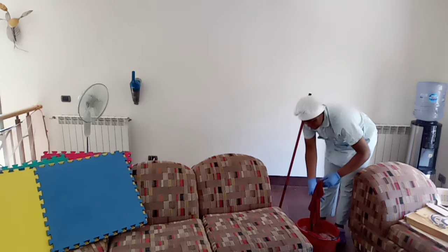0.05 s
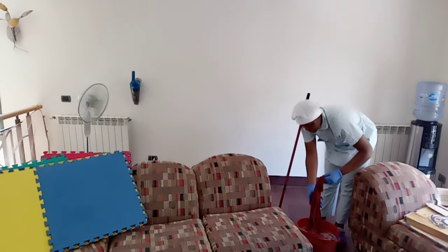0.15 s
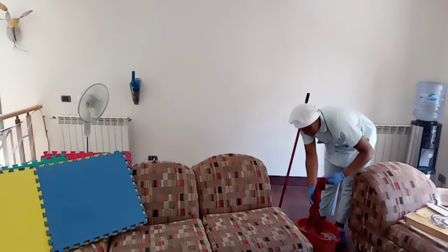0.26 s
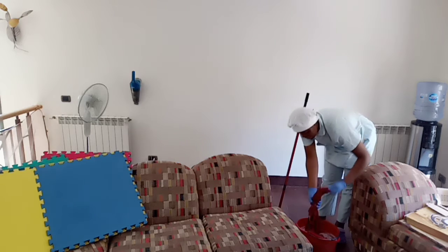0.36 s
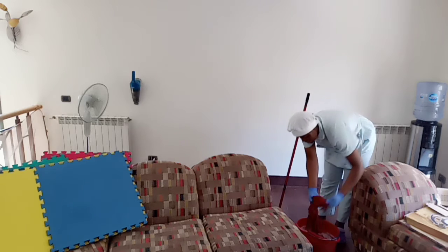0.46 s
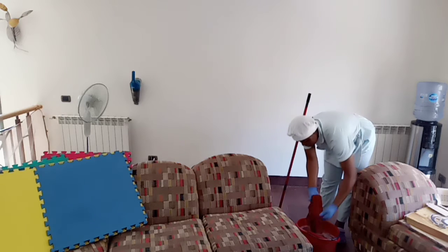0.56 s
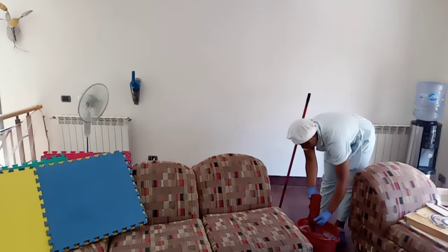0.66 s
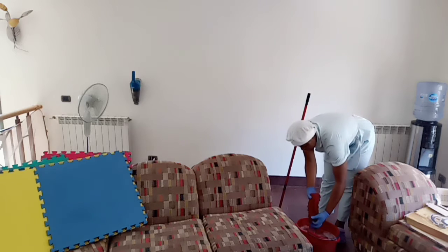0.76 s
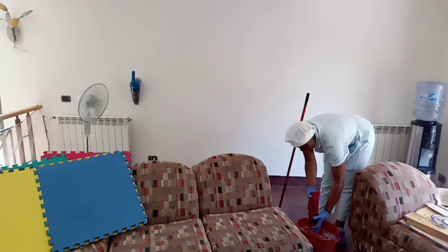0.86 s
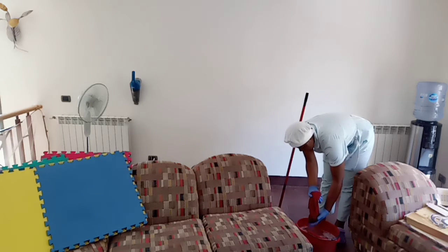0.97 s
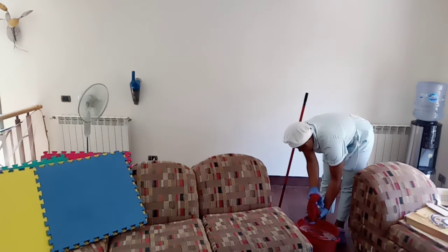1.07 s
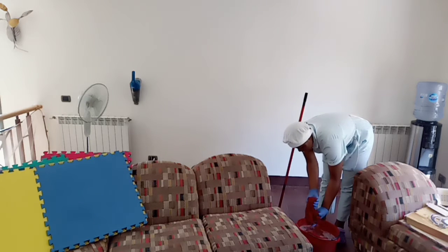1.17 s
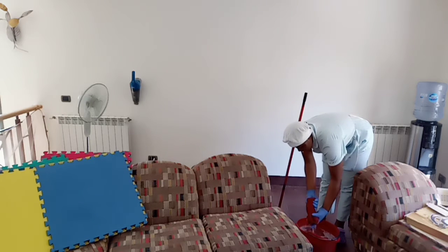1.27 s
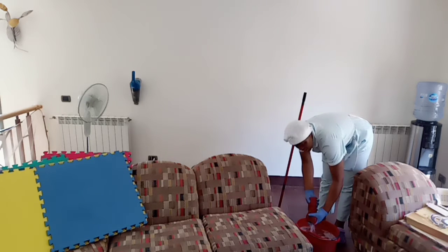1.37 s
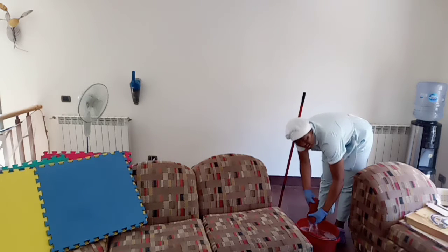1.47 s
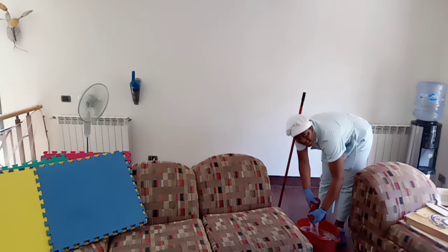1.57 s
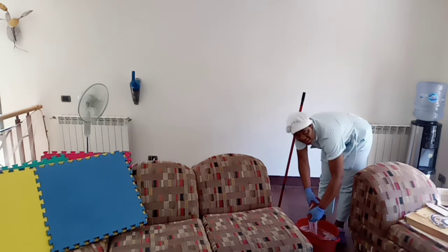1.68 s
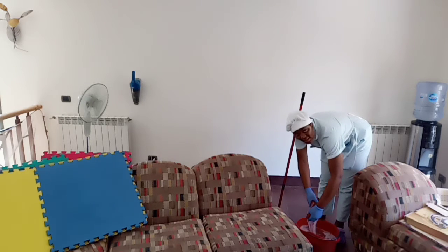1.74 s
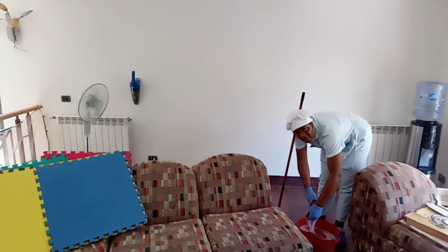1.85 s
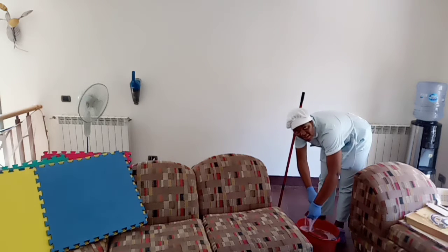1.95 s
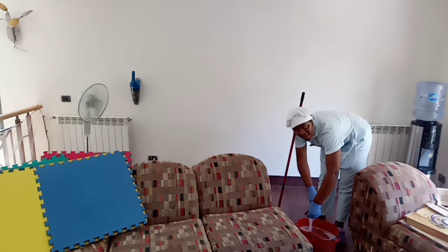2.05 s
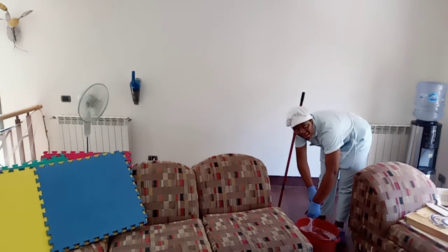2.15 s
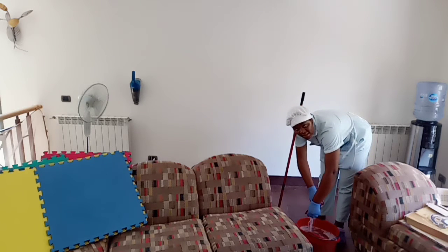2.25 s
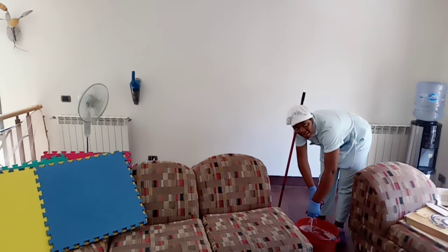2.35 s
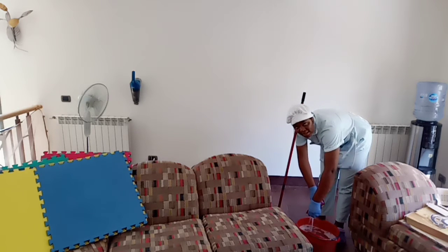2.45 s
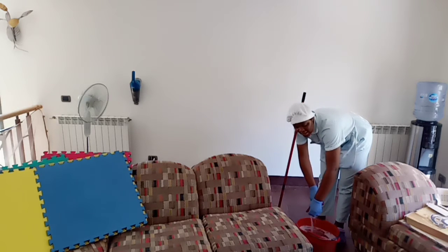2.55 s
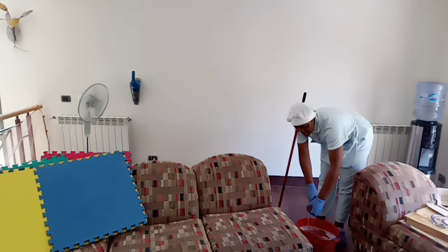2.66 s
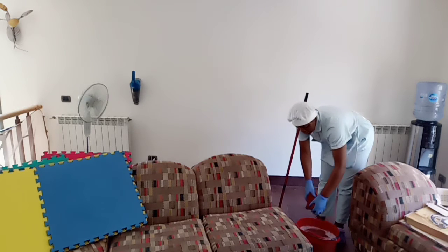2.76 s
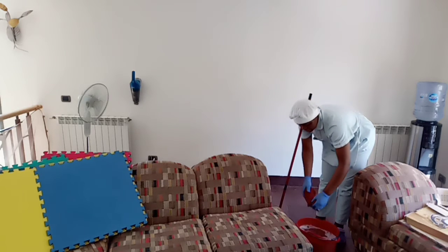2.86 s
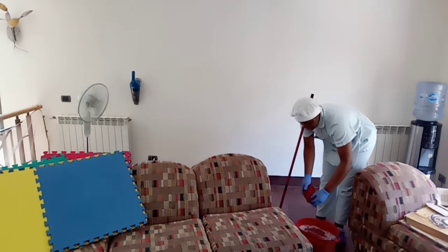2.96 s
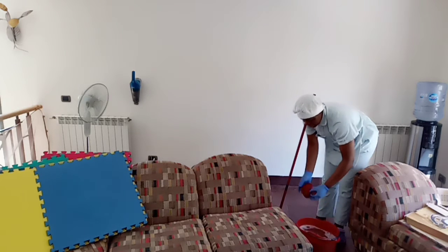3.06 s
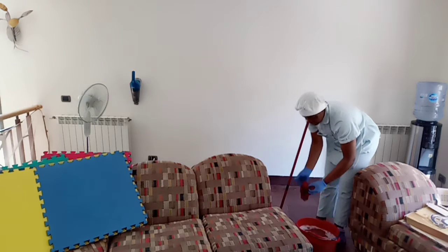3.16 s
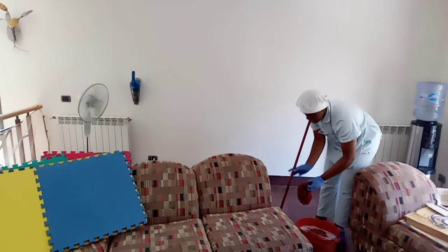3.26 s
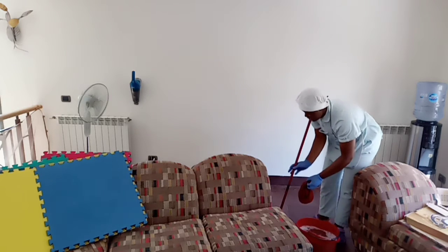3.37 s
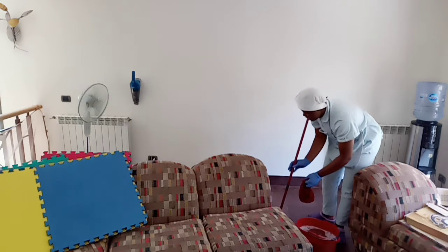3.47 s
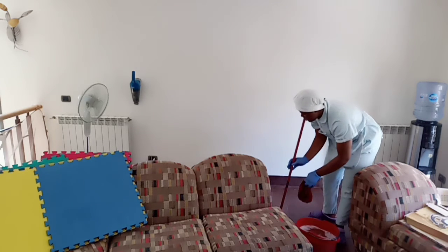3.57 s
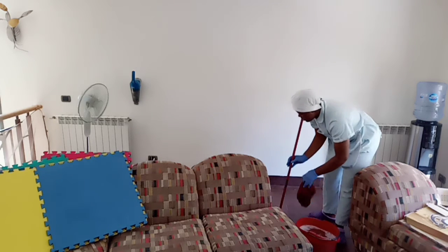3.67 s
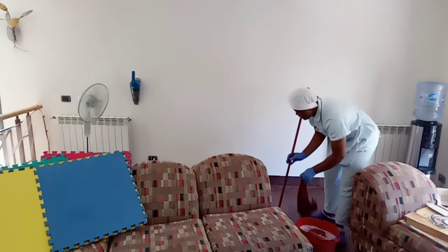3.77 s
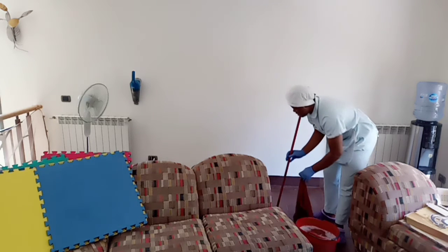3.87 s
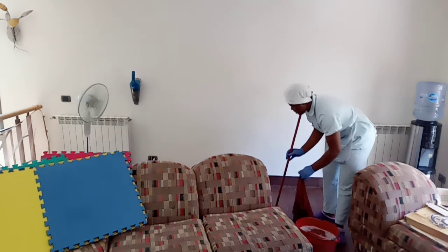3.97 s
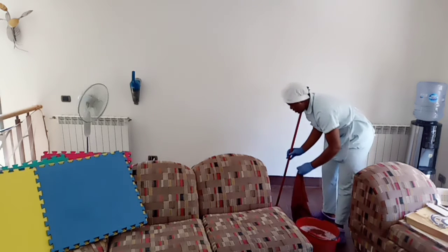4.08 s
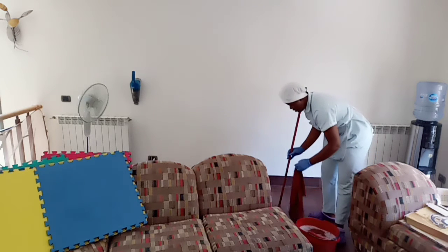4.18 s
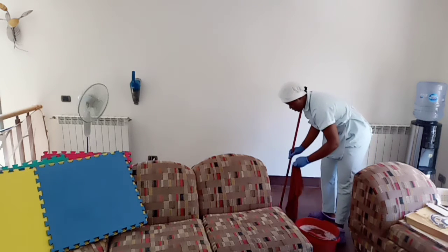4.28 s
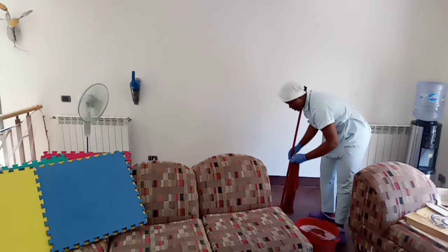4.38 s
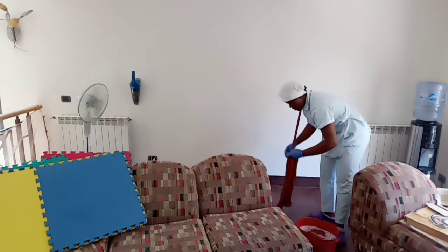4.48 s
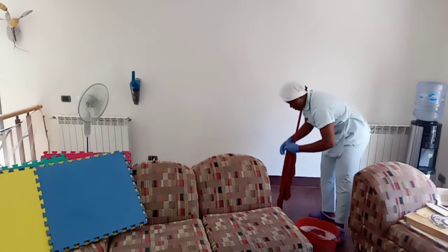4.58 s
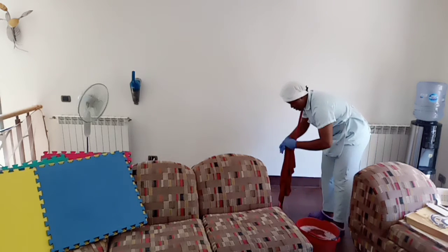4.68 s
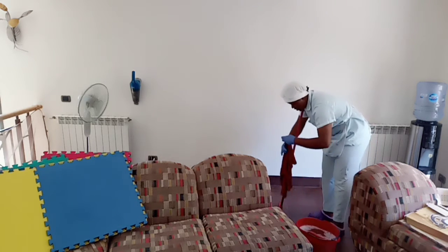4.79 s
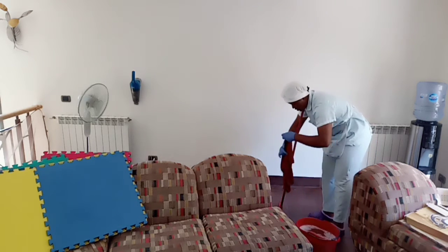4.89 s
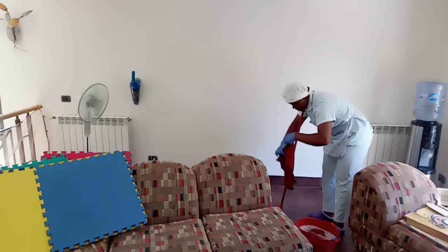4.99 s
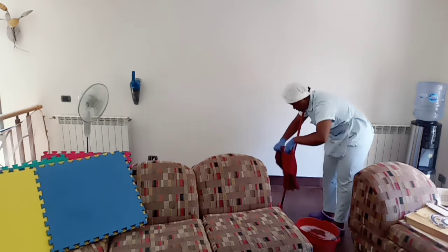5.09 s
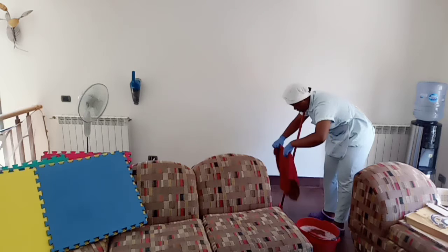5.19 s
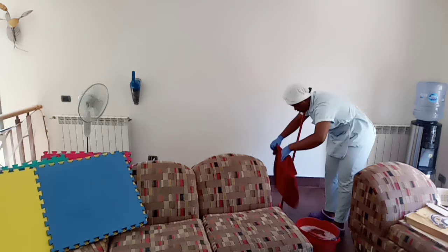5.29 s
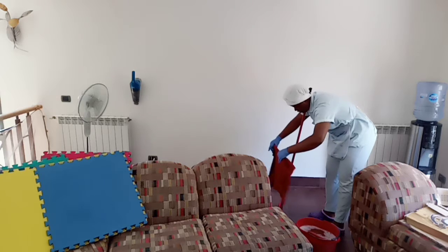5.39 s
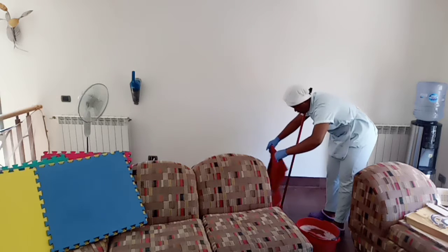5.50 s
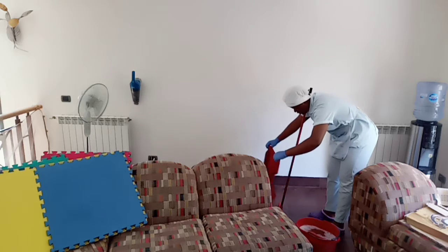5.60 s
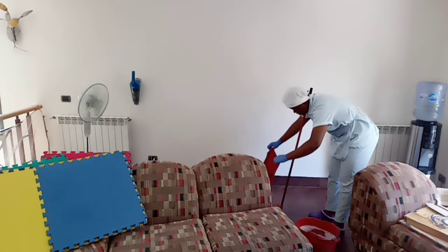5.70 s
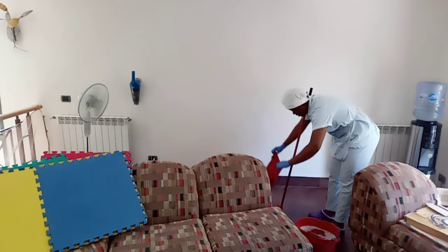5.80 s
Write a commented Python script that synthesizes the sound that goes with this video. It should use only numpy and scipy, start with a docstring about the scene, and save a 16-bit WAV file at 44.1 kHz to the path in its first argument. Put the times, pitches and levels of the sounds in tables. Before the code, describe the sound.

Faint dribbles and plinking bubbles grow into a short burst of bright, bubbly water falling into a bucket as a cloth is wrung by hand. It breaks into spray and last drips. Then come crackly wet rustles, a sharp flappy slap and a woody clack with a low thud, and quieter rustling to the end. Heard from across an echoing living room with a low, calm background.

```python
"""Water wrung from a floor cloth splashes, gurgles and thins to drips: ticking spray and swarms of ringing bubbles.
Single drops smack as noise puffs; single loud bubbles ring as damped, rising sines.
The wet cloth rustles in crackling strokes and slaps as it falls open; the mop knocks and rings damped modes.
A hard-walled room answers with noise echoes, over a quiet, slowly sinking room tone of coloured noise."""
import sys
import numpy as np
from scipy import signal
from scipy.io import wavfile

SR = 44100
rng = np.random.default_rng(int(sys.argv[2]) if len(sys.argv) > 2 else 0)


def master(y):
    """Save y as 16-bit WAV."""
    cut = np.clip(np.atleast_2d(y).T, -1, 1)
    pcm = np.round(cut * 32767)  # scale
    wavfile.write(sys.argv[1], SR, pcm.astype(np.int16))


N = 257279
TIME_S = np.arange(N) / SR

# All levels are relative, ahead of the mix gains.
# Long twist driving the stream out of the cloth: [t/s, flow/dB re full]
STREAM_FLOW = [(1.31, -17.5), (1.335, -10), (1.46, -8), (1.5, -4), (1.65, -4.5), (1.76, 0.5), (2.21, 0.5),
               (2.54, -10.5), (2.72, -16.5), (3.1, -30)]
# Short squeezes that find the grip and press out the last water: [start/s, hold/s, flow/dB re full]
SQUEEZES = [(0.332, 0.15, -17.5), (0.721, 0.088, -14), (0.869, 0.08, -12.5), (1.204, 0.031, -14),
            (2.446, 0.045, -6), (2.755, 0.13, -13)]
# Lifted cloth running a little by itself, one row: [start/s, hold/s, flow/dB re full]
DRIBBLE = (0.23, 1.0, -24.5)
# Single loud bubbles: [t/s, f/Hz, level/dB, ring time/cycles]
LOUD_BUBBLES = [(0.128, 2560, -48.5, 14), (0.338, 3010, -45, 12), (0.413, 2280, -42, 9.4),
                (0.498, 2310, -38, 6), (0.681, 1514, -47.5, 7.1), (0.732, 3710, -39.5, 22),
                (0.894, 1610, -43.5, 6.3), (0.969, 2154, -33, 5), (1.117, 3250, -50, 7.1),
                (1.209, 3900, -45, 9.6), (1.327, 514, -48.5, 5.7), (1.487, 956, -43.5, 4.1),
                (1.507, 3094, -30.5, 19), (1.697, 2556, -32, 14), (1.722, 612, -39, 5.3),
                (1.729, 3200, -26, 7.5), (1.786, 3390, -19, 7), (1.783, 580, -34, 1.7),
                (1.832, 525, -39.5, 3.2), (1.969, 840, -26, 5.4), (2.083, 3600, -25, 8.7),
                (2.085, 464, -43.5, 4), (2.113, 288, -40.5, 2.94), (2.116, 1006, -25, 4),
                (2.185, 3100, -27, 5.3), (2.367, 4600, -25.5, 3.4), (2.38, 3340, -29, 11),
                (2.45, 2070, -31.5, 22), (2.457, 2490, -26, 7.6), (2.638, 535, -39, 2.1),
                (2.735, 462, -50, 14), (2.811, 819, -33.5, 3.6), (2.811, 480, -42, 3.6),
                (2.863, 2530, -29, 2.4), (2.901, 3520, -27, 2.5), (3.011, 1525, -45.5, 4.5)]
# Single drops smacking on the water: [t/s, level/dB]
DROPS = [(0.473, -42), (0.71, -42.5), (0.781, -42.5), (0.898, -42), (1.16, -43), (1.208, -36.5),
         (1.475, -42.5), (2.118, -26), (2.218, -41), (2.501, -27), (2.865, -43), (3.021, -47), (3.389, -57)]
# Spectrum of the spray: [f/Hz, level/dB]
SPRAY_SPECTRUM = [(700, -21), (1500, -39.5), (2400, 2.5), (3800, 2), (5000, -10), (6000, -14), (7800, -12),
                  (9500, -6.5), (11500, -16.5), (15500, -24.5)]
# Spectrum of the hollow over the water in the bucket: [f/Hz, level/dB]
BUCKET_SPECTRUM = [(200, -17), (290, 7), (380, -11), (500, 7.5), (650, 4.5), (800, -9), (1500, -16)]
# Spectrum of the stream drumming in the bucket: [f/Hz, level/dB]
PATTER_SPECTRUM = [(50, -47), (90, 22.5), (170, -19), (300, 19.5), (600, 12), (1500, 6.5),
                   (2500, -42), (6000, -30)]
# Spectrum of a drop's smack: [f/Hz, level/dB]
SMACK_SPECTRUM = [(300, -14.5), (1500, -13.0), (3600, 16.0), (5200, -8), (9800, -2.5), (15000, -16)]
# Strokes of the cloth through gloved hands: [fastest t/s, rise and fall/s, rub/dB, wet fizz/dB]
STROKES = [(0.02, 0.077, -63.5, -78), (0.28, 0.086, -71, -69), (3.23, 0.13, -63, -78),
           (3.406, 0.052, -50.5, -64), (3.55, 0.042, -63, -66), (3.66, 0.088, -60, -69.5),
           (4.48, 0.089, -54, -72.5), (4.72, 0.067, -57.5, -71.5), (4.97, 0.09, -56.5, -67),
           (5.3, 0.13, -61, -70.5), (5.52, 0.08, -65.5, -76), (5.66, 0.071, -66.5, -73)]
# Spectrum of rubbing fibres: [f/Hz, level/dB]
RUB_SPECTRUM = [(200, -36.5), (600, 7), (1400, 0), (2400, 9.5), (3800, 8.5), (5000, -5), (9000, -46)]
# Spectrum of the wet fizz: [f/Hz, level/dB]
FIZZ_SPECTRUM = [(2500, -11), (5000, 0), (8000, 2.5), (9500, 8), (11500, -4), (15500, -10)]
# Folds of the wet cloth landing: [t/s, level/dB, decay/s]
SLAPS = [(3.955, -37, 0.0059), (3.959, -31.5, 0.0085), (3.9635, -27.5, 0.0056), (3.9725, -23, 0.006),
         (3.980, -36.5, 0.01)]
# Spectrum of the slap: [f/Hz, level/dB]
SLAP_SPECTRUM = [(50, -34), (100, -7.5), (300, -3), (600, -1), (1050, -9.5), (1700, -2), (2400, 2.5),
                 (3900, 1.5), (5200, -14.5), (8000, -12.5), (9500, -10.5), (12000, -23), (15500, -27)]
# Mop head meeting the floor and rattling: [t/s, level/dB, decay/s]
KNOCKS = [(4.2835, -28, 0.011), (4.288, -19, 0.0061), (4.2922, -12.5, 0.0014), (4.3012, -17, 0.0011),
          (4.317, -25.5, 0.0017)]
# Spectrum of the knock: [f/Hz, level/dB]
KNOCK_SPECTRUM = [(30, -23), (60, -16), (85, 0), (160, 0.5), (250, 6), (330, 1.5), (600, -2), (950, -2.5),
                  (1200, -10), (1600, -5.5), (2300, 0.5), (2900, -4.5), (4100, -5), (5000, -21),
                  (9200, -25), (12000, -48)]
# Modes of mop and floor set ringing by the knock: [f/Hz, level/dB, t60/s]
MOP_MODES = [(102, -41, 0.54), (123.2, -36.5, 0.67), (131.3, -34, 0.71), (207.7, -29, 0.43),
             (265, -38, 0.57), (589, -45, 0.23), (1510, -32.5, 0.083), (2350, -15, 0.027)]
# Reverberation of the room: [f/Hz, t60/s]
ROOM_T60 = [(120, 0.96), (350, 0.54), (900, 0.58), (2500, 0.55), (6000, 0.4), (14000, 0.39)]
# Spectrum of the room tone: [f/Hz, level/dB]
HUSH_SPECTRUM = [(25, -32), (50, -4.5), (100, 10.5), (160, 6.5), (300, 3), (700, -1.5), (1400, -8),
                 (2500, -3), (3800, -4.5), (5200, -23), (9500, -18.5), (15000, -31)]

# Parts of the water's sound: (level/dB at full flow, dB gained per dB of flow)
SPRAY_LAW, TINKLE_LAW, SQUELCH_LAW = (-49.5, 0.96), (-42, 1.025), (-53.5, 0.88)
BURBLE_LAW, GURGLE_LAW = (-50, 0.88), (-51.5, 1.31)
# As the cloth empties, more of the stream falls as fine spray; 0 dB at FULL_S
FULL_S, BREAKUP_DB_PER_S = 2.17, 7.0
SQUEEZE_ATTACK_S, SQUEEZE_RELEASE_S = 0.019, 0.037
GURGLE_LAG_S = 0.07  # large bubbles come up from deep, a little after the stream
HOUSE_DB, HOUSE_DRIFT_DB_PER_S = -64, -0.58
EDGE_HZ = 15680


def water():
    """Spray ticks, small bubbles tinkle, the stream gurgles and drums in the bucket; all follow the flow."""
    stream = levels(STREAM_FLOW)
    trickle = np.linalg.norm([squeeze(*row) for row in [DRIBBLE, *SQUEEZES]], axis=0)
    breakup = amp(BREAKUP_DB_PER_S * (TIME_S - FULL_S))
    spray = follow(np.hypot(stream * breakup, trickle), SPRAY_LAW)
    small = follow(stream, TINKLE_LAW)
    beads = follow(trickle, TINKLE_LAW)
    splash = follow(stream, BURBLE_LAW) + follow(trickle, SQUELCH_LAW)
    large = follow(np.interp(TIME_S - GURGLE_LAG_S, TIME_S, stream), GURGLE_LAW)

    # the stream breaks into lumps, so the spray comes in spurts some hundredths of a second long
    lowpass = signal.butter(2, 60, fs=SR, output="sos")
    lumps = evened(signal.sosfilt(lowpass, rng.standard_normal(N)))
    spurts = evened(amp(5.36 * lumps))
    clicks = crackle(2500 + 4000 * spray / spray.max(), spread_db=1)
    ticks = colour(clicks * spurts, SPRAY_SPECTRUM) * spray
    sparkle = swarm(spray, peak_per_s=430, low_hz=4230, high_hz=13950, cycles=5.1, rise=0.039, spread_db=25.5)

    clusters = evened(amp(2 * lumps))  # each lump drags down its own cloud of bubbles
    tinkle = swarm(small * clusters, peak_per_s=820, low_hz=1921, high_hz=4146, cycles=7.1, rise=0.03,
                   spread_db=9)
    # a trickle makes few enough bubbles to tell apart
    plinks = swarm(beads, peak_per_s=230, low_hz=1980, high_hz=4310, cycles=8.2, rise=0.029, spread_db=7.5)
    burble = swarm(splash, peak_per_s=900, low_hz=735, high_hz=2206, cycles=4.2, rise=0.059, spread_db=18)
    gurgle = swarm(large, peak_per_s=370, low_hz=278, high_hz=792, cycles=4.6, rise=0.015, spread_db=5.5)
    patter = colour(crackle(1500, spread_db=6.0), PATTER_SPECTRUM)

    fine = amp(6.5) * ticks + amp(-2.0) * matched(colour(sparkle, SPRAY_SPECTRUM), spray)
    middle = matched(tinkle, small) + matched(plinks, beads) + matched(burble, splash)
    deep = matched(colour(gurgle, BUCKET_SPECTRUM), large) + amp(-15.5) * patter * spray
    return fine + middle + deep


def squeeze(start_s, hold_s, db):
    """Flow from one press on the cloth: wells up, holds, runs out."""
    age_s = TIME_S - start_s
    attack = np.clip(age_s / SQUEEZE_ATTACK_S, 0, 1)
    return amp(db) * attack * np.exp(-np.maximum(age_s - hold_s, 0) / SQUEEZE_RELEASE_S)


def follow(flow, law):
    """Gain of one part of the water's sound: a power law of the flow."""
    db, growth = law
    return amp(db) * (flow + 1e-9) ** growth


def swarm(level, peak_per_s, low_hz, high_hz, cycles, rise, spread_db, count=14000):
    """Bubbles of all sizes between two pitches; more of them as the level grows."""
    out = np.zeros(N)
    rate_per_s = peak_per_s * (level / level.max()) ** 0.33
    when, chance, pitch, size, ring = rng.random((count, 5)).T
    at = (when * N).astype(int)
    for k in np.flatnonzero(chance < rate_per_s[at] * N / SR / count):
        hz = low_hz * (high_hz / low_hz) ** pitch[k]
        tone = bubble(hz, cycles * (.5 + ring[k]), rise * 2 * ring[k], swell=0.046)
        # dividing by the root of the rate keeps the power on the level curve
        gain = amp(spread_db * size[k] ** 3) * level[at[k]] / np.sqrt(rate_per_s[at[k]])
        add(out, at[k] / SR, tone / np.linalg.norm(tone) * gain)
    return out


def bubble(hz, cycles, rise, swell):
    """A trapped bubble swells, rings and goes up in pitch as it nears the surface."""
    age = np.arange(0, 6, hz / (cycles * SR))  # in ring times
    envelope = (1 - np.exp(-age / swell)) ** 2 * np.exp(-age)
    return envelope * np.sin(2 * np.pi * cycles * (age + rise * age ** 2 / 2))


def drips():
    """Larger drops: a smack on the surface, or a small splash with the ring of one bubble."""
    smacks = bursts([(s, db, .003) for s, db in DROPS])
    out = colour(smacks, SMACK_SPECTRUM)
    for s, hz, db, cycles in LOUD_BUBBLES:
        swell = .15 + (700 / hz) ** 2  # big bubbles pinch off slowly
        ring = bubble(hz, cycles, rise=0.02, swell=swell)
        band = [(hz * 0.61, -25), (hz, 0), (hz * 1.56, -18), (hz * 4, -40)]
        splash = evened(colour(rng.standard_normal(len(ring)), band, size=1024))
        envelope = abs(signal.hilbert(ring))
        add(out, s, amp(db) * (ring + amp(-9.5) * splash * envelope) / ring.max())
    return out


def cloth():
    """Wet fibres rub and stick as the cloth is spread, and slap once as it falls open."""
    rub_gain, fizz_gain = strokes()
    rub = rub_gain * colour(crackle(2500, spread_db=2.0), RUB_SPECTRUM)
    fizz = fizz_gain * colour(crackle(3000, spread_db=0.5), FIZZ_SPECTRUM)
    rustle = amp(1) * rub + amp(3.0) * fizz
    slap = amp(-5.5) * blows(SLAPS, SLAP_SPECTRUM, scatter_db=0, tail_db=1.5)
    return room(rustle, direct_db=-3.5, scatter_db=-8.5, tail_db=-19) + slap


def strokes():
    """Gains of rub and fizz: each stroke gathers speed and slows again."""
    s, width_s, rub_db, fizz_db = np.transpose(STROKES)[:, :, None]
    speed = np.exp(-abs(TIME_S - s) / width_s)
    return [np.linalg.norm(amp(db) * speed, axis=0) for db in (rub_db, fizz_db)]


def mop():
    """The mop knocks on the floor: a hard clack over a ringing thud."""
    return amp(-6.5) * blows(KNOCKS, KNOCK_SPECTRUM, scatter_db=-24, tail_db=1.5) + ringing()


def ringing():
    """The hardest contact sets mop head and floor ringing: damped sines."""
    out, t = np.zeros(N), TIME_S[:SR]
    hardest_s = max(KNOCKS, key=lambda row: row[1])[0]
    for hz, db, t60_s in MOP_MODES:
        envelope = amp(db - 60 * t / t60_s) * (1 - np.exp(-t * hz / 2.0))
        add(out, hardest_s, envelope * np.sin(2 * np.pi * (hz * t + rng.random())))
    return out


def blows(rows, spectrum, scatter_db, tail_db):
    """A quick run of contacts, each filling the room in proportion to its energy."""
    out = bursts(rows)
    for s, db, decay_s in rows:
        root_energy = amp(db) * np.sqrt(decay_s * SR / 2)
        add(out, s, root_energy * echoes(scatter_db, tail_db))
    return colour(out, spectrum)


def bursts(rows):
    """Contacts as short puffs of noise: rows of t/s, level/dB, decay/s."""
    out, t = np.zeros(N), TIME_S[:SR // 10]
    for s, db, decay_s in rows:
        add(out, s, amp(db) * np.exp(-t / decay_s) * rng.standard_normal(len(t)))
    return out


def room(x, direct_db, scatter_db, tail_db, count=7):
    """The source wanders from spot to spot in a cycle, each spot with its own echoes."""
    out = amp(direct_db) * x
    spot = TIME_S * 45  # spots passed, 45 a second
    for k in range(count):
        share = np.maximum(1 - abs((spot - k) % count - 1), 0)
        out = out + signal.oaconvolve(x * np.sqrt(share), echoes(scatter_db, tail_db))[:N]
    return out


def echoes(scatter_db, tail_db, size=SR * 3 // 4):
    """Room's answer to a click: scatter from nearby furniture, then a tail whose treble dies first."""
    age_s = TIME_S[:size]
    hz, t, z = signal.stft(rng.standard_normal(size), SR, nperseg=256)
    decay = amp(-60 * t / read(ROOM_T60, hz)[:, None])
    tail = signal.istft(z * decay, SR, nperseg=256)[1][:size]
    tail *= 1 - np.exp(-age_s / 0.0031)
    scatter = rng.standard_normal(size) * np.exp(-age_s / 0.02)
    return amp(tail_db) * tail / np.linalg.norm(tail) + amp(scatter_db) * scatter / np.linalg.norm(scatter)


def hush():
    """Quiet tone of the house: coloured noise, sinking slowly."""
    gain = amp(HOUSE_DB + HOUSE_DRIFT_DB_PER_S * TIME_S)
    return gain * colour(rng.standard_normal(N), HUSH_SPECTRUM)


def crackle(per_s, spread_db):
    """Random clicks of uneven size, rms one; per_s may be a curve."""
    share = np.clip(per_s / SR, 1e-5, 1)
    size = amp(spread_db * np.minimum(rng.exponential(1, N), 3.5)) * rng.choice([-1, 1], N)
    return evened(size * (rng.random(N) < share) / np.sqrt(share))


def colour(x, points, size=4096):
    """Minimum-phase filter of unit energy with the given spectrum."""
    log_gain = np.log(amp(read(points, abs(np.fft.fftfreq(size, 1 / SR)))))
    response = np.exp(np.conj(signal.hilbert(log_gain)))
    taps = np.fft.ifft(response).real[:size // 2]
    return signal.oaconvolve(x, taps / np.linalg.norm(taps))[:len(x)]


def read(points, hz):
    """Table joined by lines on a log-frequency axis."""
    f, value = np.transpose(points)
    return np.interp(np.log(hz + 1), np.log(f + 1), value)


def levels(rows):
    """Gain curve through rows of t/s, level/dB, fading to silence outside them."""
    s, db = np.transpose(rows)
    outside_s = np.maximum(s[0] - TIME_S, 0) + np.maximum(TIME_S - s[-1], 0)
    return amp(np.interp(TIME_S, s, db)) * np.exp(-outside_s / 0.056)


def matched(x, level):
    """Gives x the overall power of a gain curve."""
    return evened(x) * np.sqrt(np.mean(level ** 2))


def evened(x):
    """Scales to an rms of one."""
    return x / np.sqrt(np.mean(x ** 2) + 1e-20)


def amp(db):
    """Decibels to amplitude."""
    return 10 ** (np.asarray(db) / 20)


def add(mix, s, sound):
    """Adds a sound to the mix in place from time s, cut at the end."""
    part = mix[max(round(s * SR), 0):][:len(sound)]
    part += sound[:len(part)]


def scene():
    """Stream and drops share the corner by the bucket; cloth and mop sound over the open floor."""
    stream = room(water(), direct_db=-3.5, scatter_db=-3.0, tail_db=-6.5)
    drops = room(drips(), direct_db=-4.5, scatter_db=-5.5, tail_db=-8.5)
    return (stream + drops + cloth() + mop() + hush())[None]


def record(dry):
    """Band limit: linear-phase low-pass at EDGE_HZ."""
    taps = signal.firwin(511, EDGE_HZ, window=("kaiser", 9), fs=SR)
    return signal.oaconvolve(dry, taps[None], "same")


dry = scene()
out = record(dry)
master(out)
```